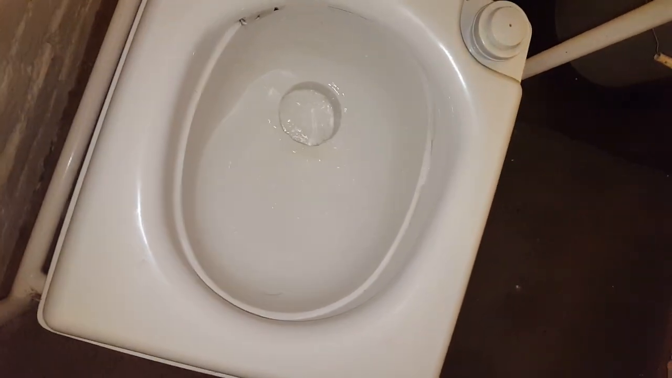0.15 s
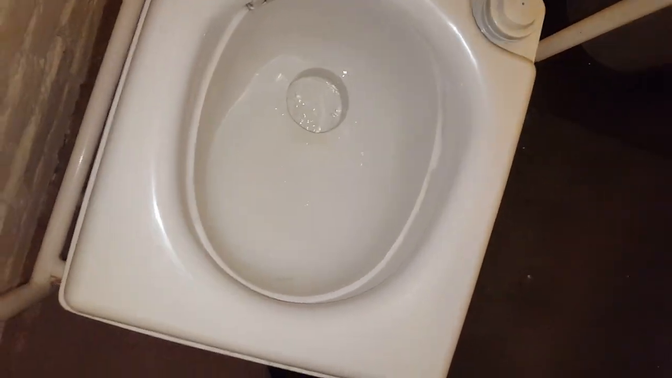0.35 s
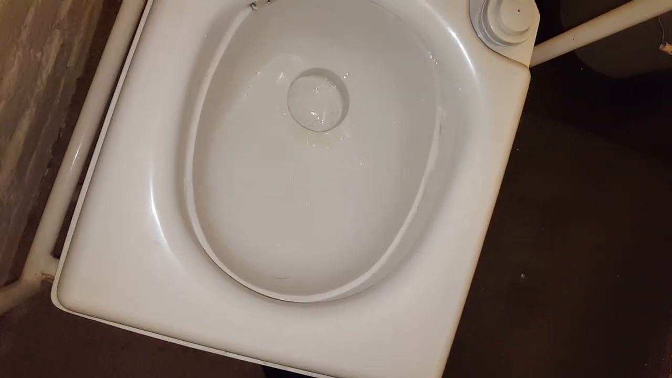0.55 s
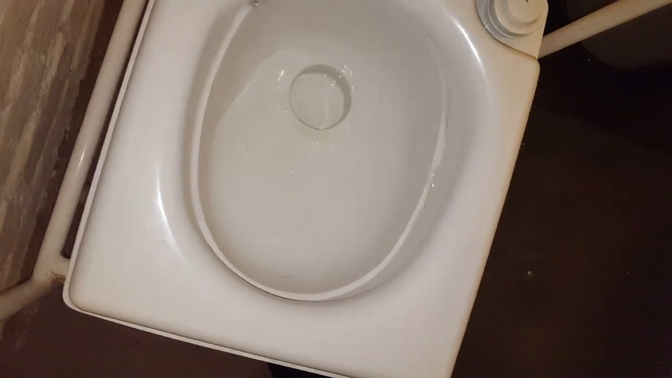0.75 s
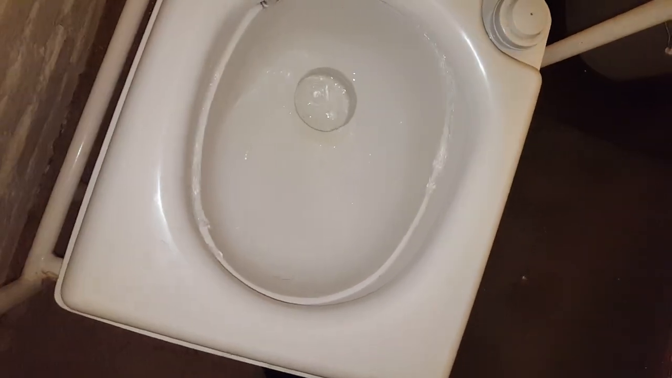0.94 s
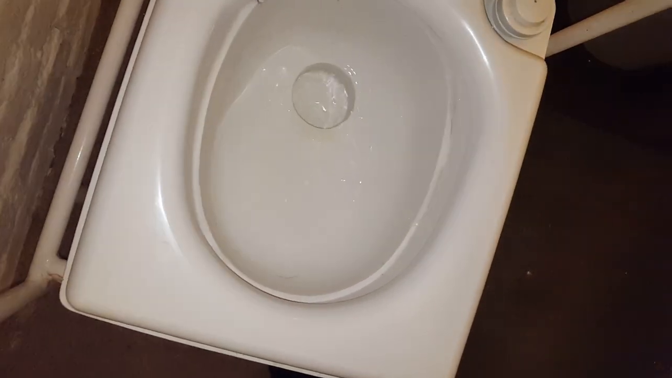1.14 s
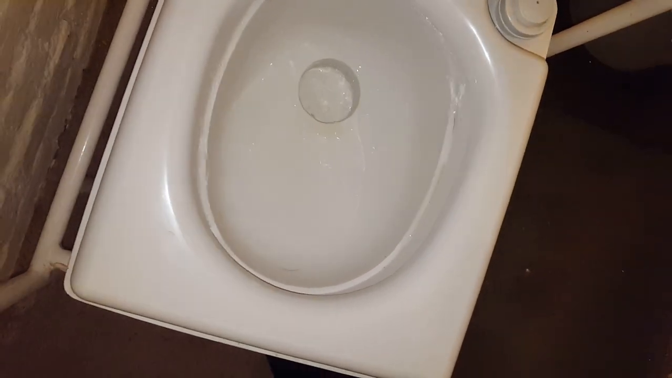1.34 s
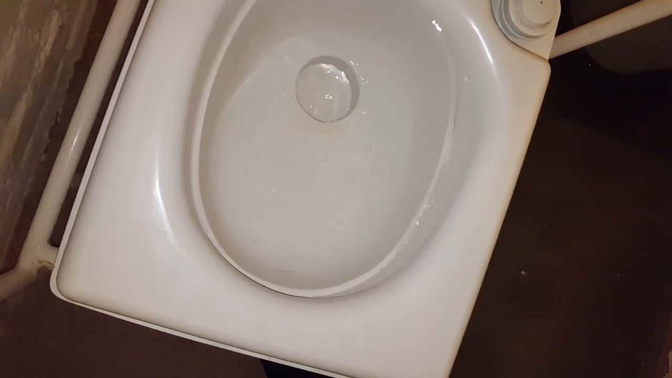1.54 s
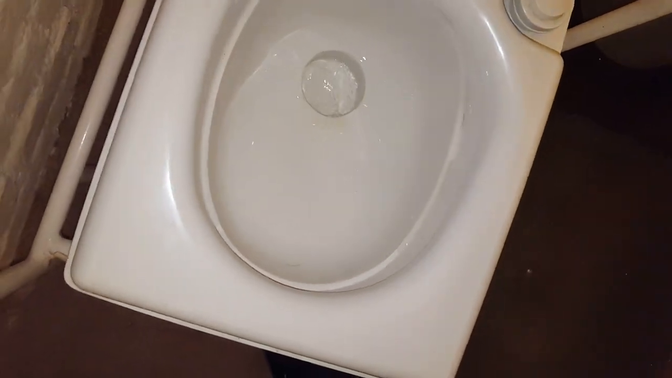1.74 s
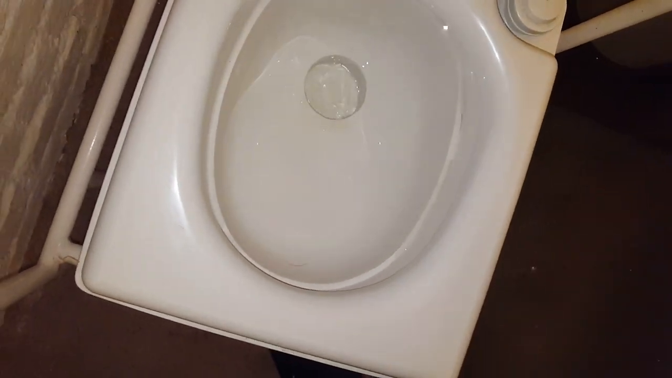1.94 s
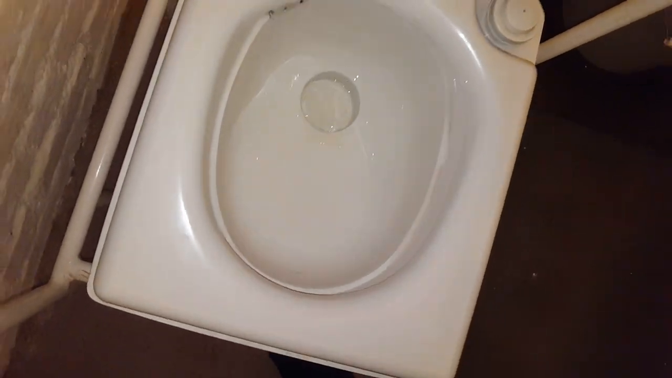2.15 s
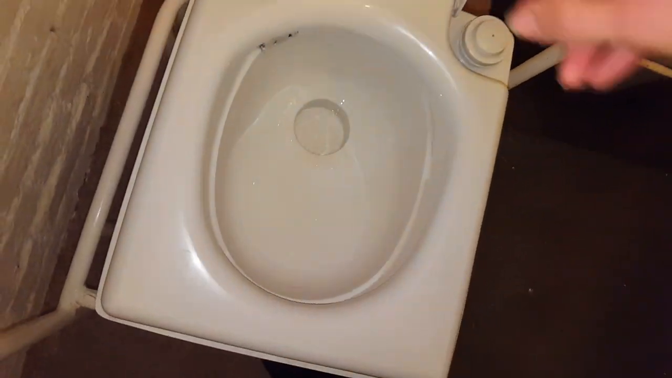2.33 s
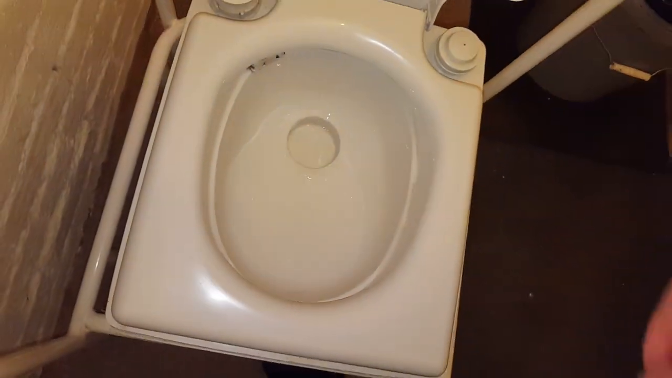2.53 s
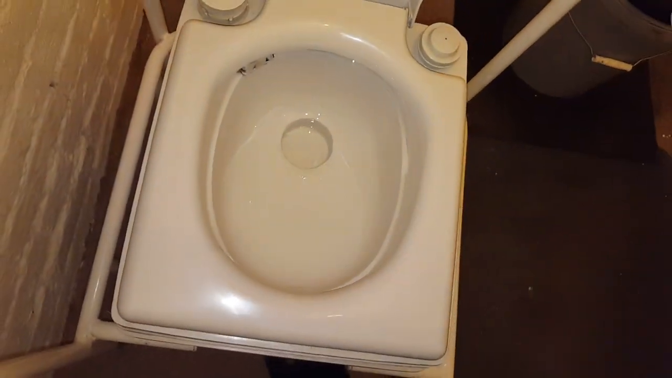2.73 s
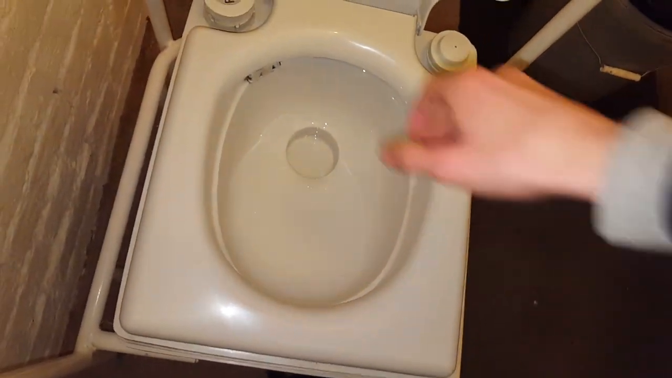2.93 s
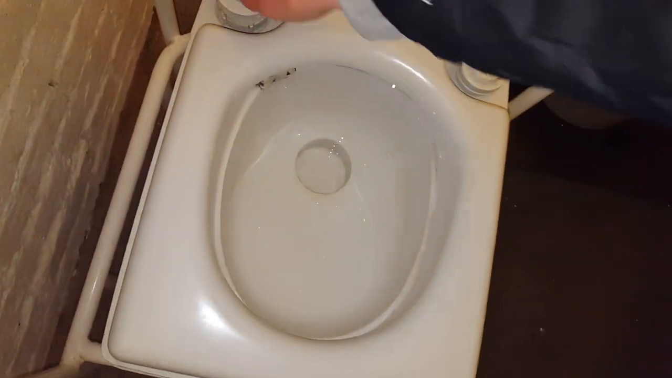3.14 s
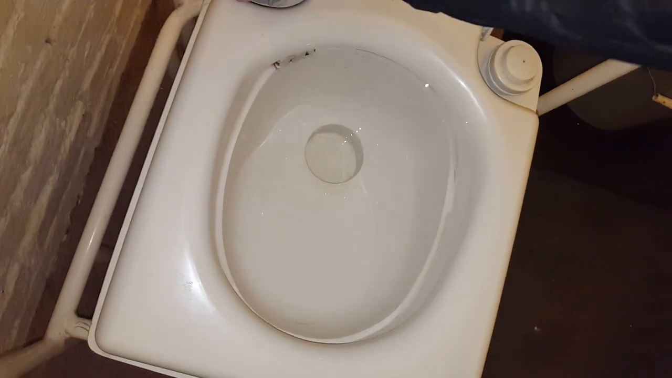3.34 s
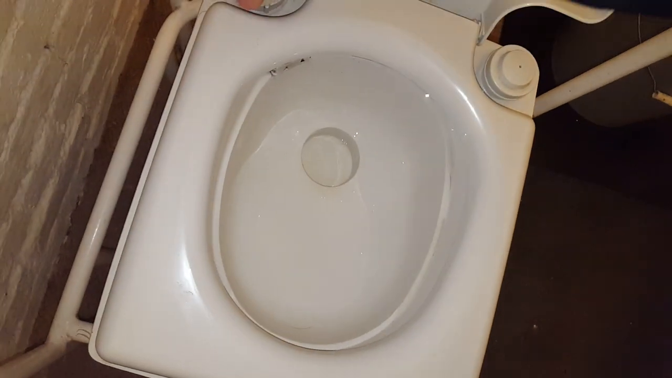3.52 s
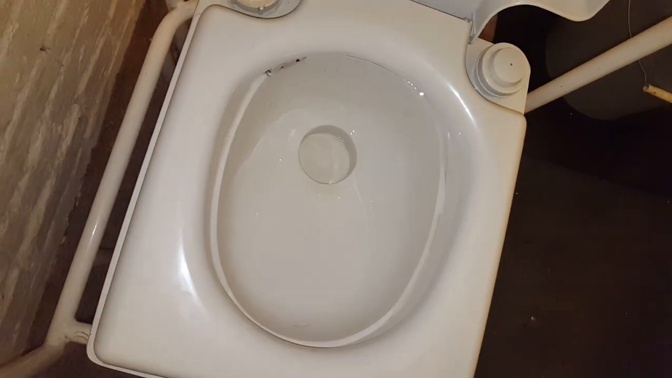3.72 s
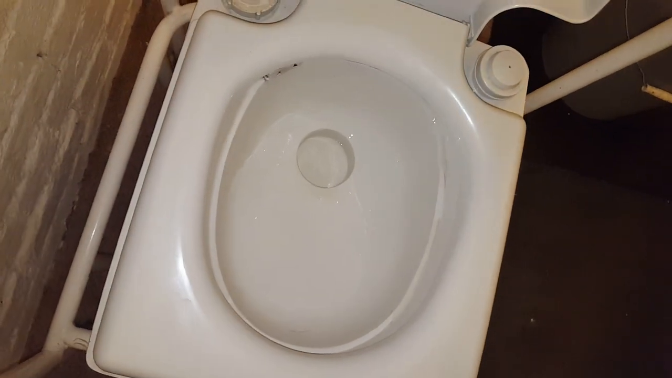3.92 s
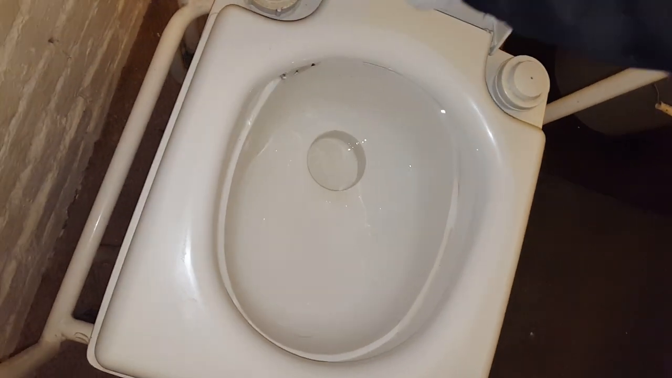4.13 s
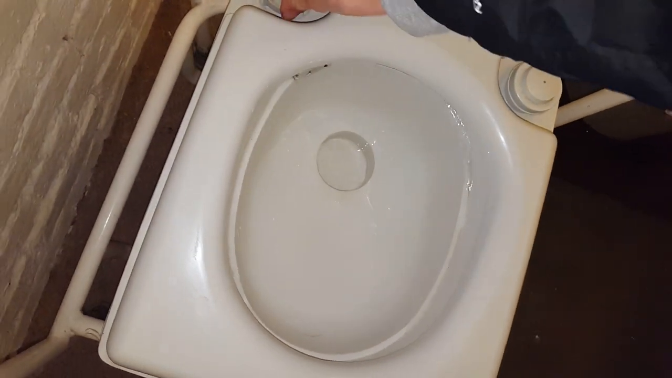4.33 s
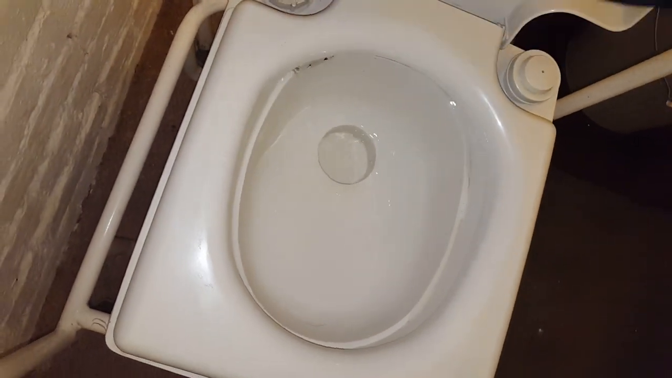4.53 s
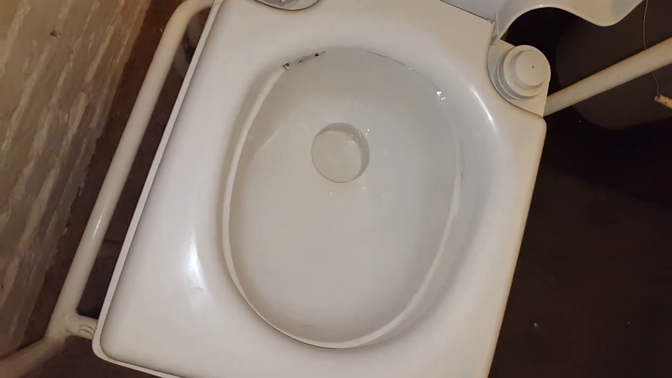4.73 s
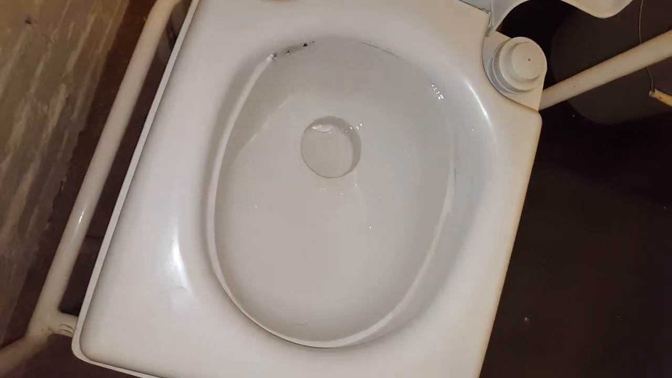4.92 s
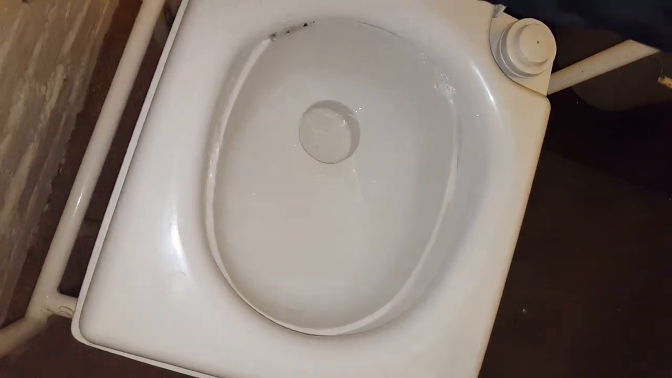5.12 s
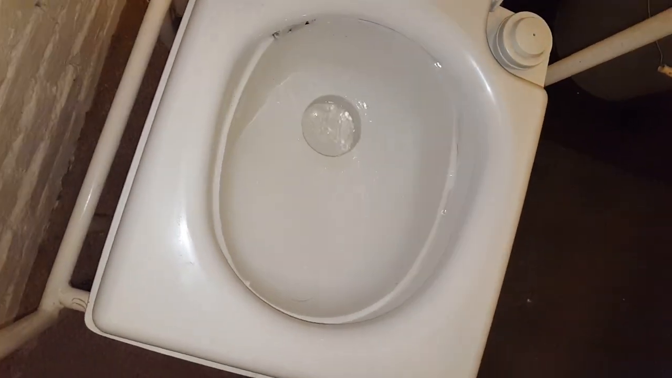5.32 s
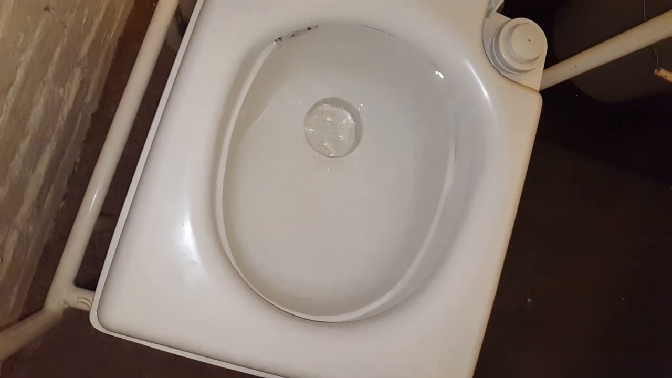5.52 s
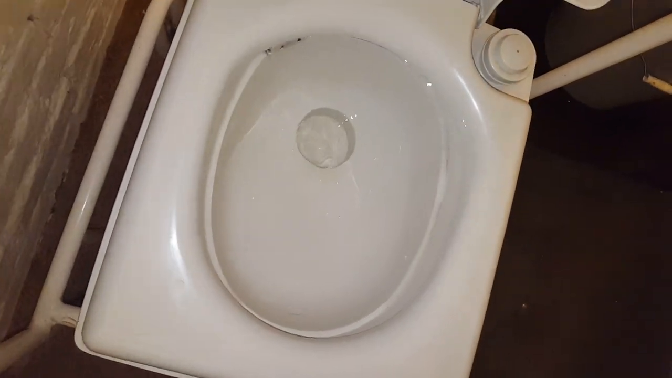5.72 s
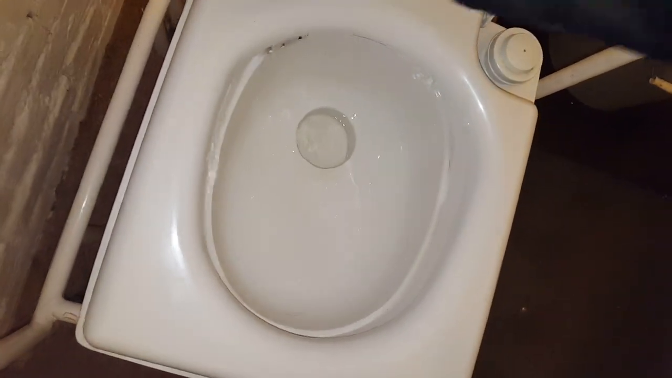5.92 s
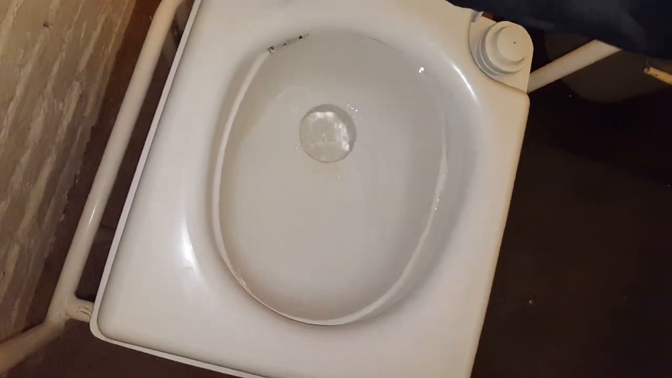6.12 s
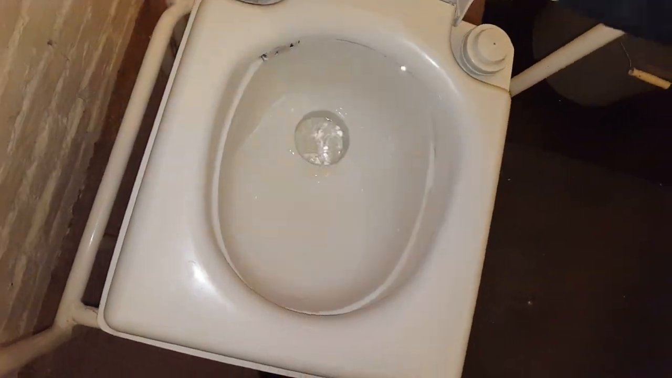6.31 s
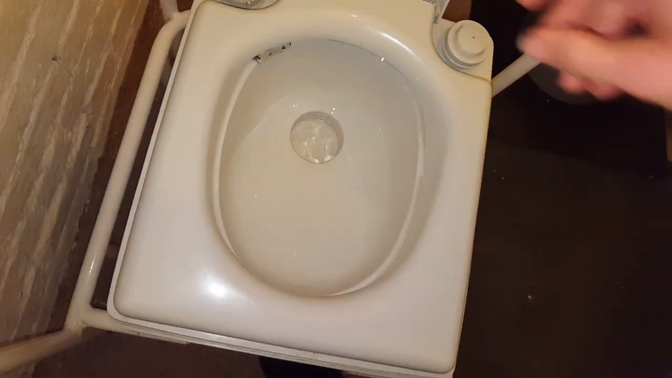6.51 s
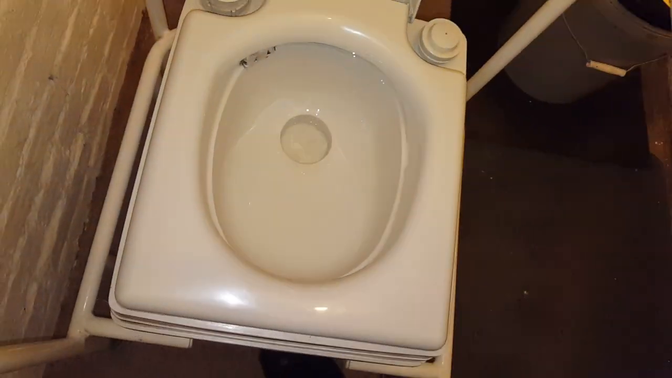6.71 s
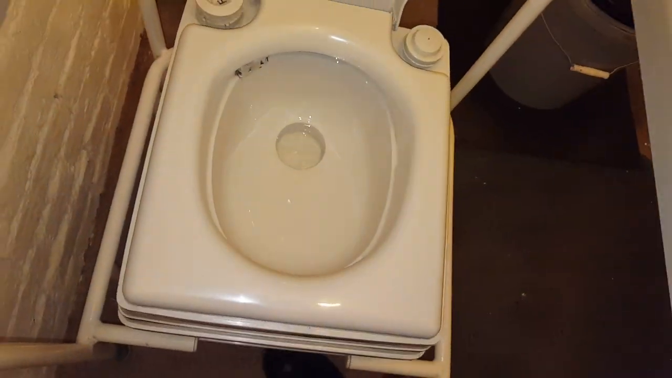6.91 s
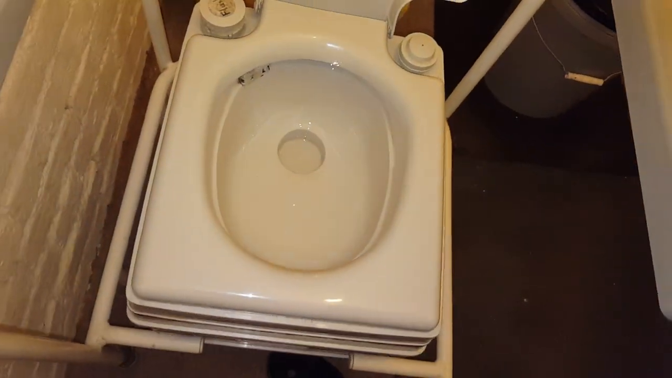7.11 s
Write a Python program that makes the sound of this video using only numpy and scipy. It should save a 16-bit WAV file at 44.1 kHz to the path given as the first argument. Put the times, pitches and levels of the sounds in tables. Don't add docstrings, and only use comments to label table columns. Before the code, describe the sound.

Rapid hollow plastic clacks and juddering scrapes of a toilet's hand pump, wet gurgles and air spits, a quiet pause, then a second bout with sharp slams.

```python
import sys
import numpy as np
from scipy import signal
from scipy.fft import rfft, irfft, next_fast_len
from scipy.io import wavfile
from scipy.ndimage import uniform_filter1d

SR = 44100
rng = np.random.default_rng(int(sys.argv[2]) if len(sys.argv) > 2 else 0)


def boost(x):
    u = np.asarray(x, float) / 20
    return 10 ** u


def generate_wav(signal):
    frames = np.transpose(np.atleast_2d(signal))
    scaled = np.clip(frames, -1, 1) * 32767
    pcm = np.round(scaled).astype(np.int16)
    wavfile.write(sys.argv[1], SR, pcm)


N = 315756

# (time at strength [s], hold [s], swell over the hold [dB], scrape [dB], seal hiss [dB])
PUSHES = [(0.134, 0.38, 6, -33.5, -40), (0.423, 0.068, 4, -21.5, -27.5), (0.62, 0.018, 10.5, -41, -46.5),
          (0.822, 0.089, 3.5, -18.5, -24), (1.06, 0.031, -8, -30.5, -36.5), (1.275, 0.09, 1, -18, -24.5),
          (1.427, 0.019, 11.5, -33.5, -40.5), (1.59, 0.12, 12, -34, -41), (1.925, 0.03, -9, -40, -76),
          (3.62, 0.027, 20.5, -54, -67), (3.74, 0.21, -22, -27, -58), (4.19, 0.068, 1, -30, -32),
          (4.445, 0.0098, 3.5, -45, -55.5), (4.69, 0.034, -2.5, -23, -32.5), (5.011, 0.11, 6.5, -30, -35),
          (5.29, 0.016, -7, -40.5, -46.5), (5.4, 0.21, 0, -29, -34.5), (5.865, 0.12, 5, -34, -34)]
# (time [s], hold [s], swell over the hold [dB], scrape [dB], seal hiss [dB])
JERKS = [(0.0, 0.009, -9, -25.5, -33.5), (0.255, 0.084, 1.5, -22.5, -31.5),
         (0.668, 0.074, -1.5, -26.5, -32), (1.088, 0.083, -6.5, -21, -31), (1.65, 0.027, -14.5, -15, -34.5),
         (1.746, 0.079, -20, -15.5, -20.5), (3.67, 0.13, -4.5, -24, -33), (4.0, 0.0087, -12, -27, -37),
         (4.067, 0.069, 2, -32, -69), (4.098, .035, -2, -45, -32.5), (4.135, .012, -9, -34, -23.5),
         (4.276, 0.011, -7, -19.5, -20.5), (4.492, 0.12, 14.5, -34.5, -44.5), (4.889, 0.015, -10, -27, -48),
         (4.935, 0.049, 3.5, -29, -44), (5.15, 0.069, -19, -23.5, -19.5), (5.795, 0.067, 6, -34, -65.5),
         (6.008, 0.026, 2, -30.5, -26.5)]
LEAN_IN_DB_PER_S, BREAK_DB_PER_S = (305.5, 357.5), 3002
LET_GO_DB_PER_S = (282, 318.5)
# (time [s], frame thump [dB], tank hum [dB], lid drumming [dB])
JOLTS = [(0.0, -37, -23.5, -32), (0.062, -45, -35.5, -31), (0.205, -62.5, -28.5, -26),
         (0.294, -27.5, -26, -29), (0.416, -50, -27.5, -26), (0.52, -36.5, -29, -35.5),
         (0.682, -48.5, -37, -36), (0.726, -27.5, -29, -25), (0.865, -30, -23.5, -20),
         (0.944, -30, -20, -20), (1.132, -54, -42.5, -39), (1.327, -27, -23, -31), (1.44, -49, -24, -28.5),
         (1.653, -40, -37.5, -27.5), (1.728, -23.5, -23.5, -20.5), (1.87, -44.5, -45.5, -36.5),
         (3.091, -49.5, -51, -66), (3.3, -40.5, -51, -50), (3.704, -27.5, -25, -21.5),
               (3.789, -43.5, -23.5, -18.5), (3.842, -38.5, -21, -35.5), (4.093, -58, -34, -28.5),
               (4.282, -45, -39.5, -28), (4.369, -40, -40, -44), (4.584, -45.5, -34, -32.5),
               (4.72, -55, -42.5, -34), (4.793, -56.5, -36, -42.5), (4.924, -49.5, -35.5, -30.5),
               (5.06, -60, -33, -29.5), (5.14, -24.5, -32.5, -19), (5.35, -47.5, -50.5, -40.5),
               (5.424, -63.5, -57, -34.5), (5.491, -69, -41, -31.5), (5.639, -47, -29.5, -23),
               (5.765, -66, -35, -37.5), (5.896, -64, -36.5, -23), (6.027, -34, -23, -25),
               (6.122, -43, -28.5, -36.5), (6.201, -61, -38, -50)]
JOLT_HOLD_S = 0.017
JOLT_GROWS_DB_PER_S = (900.5, 451.5, 495)
JOLT_DIES_DB_PER_S = (200.5, 148.5, 182)
CREEP_DB, CREEP_DIES_DB_PER_S = -30, 64.5

# (time [s], peak level [dB], crack level [dB])
KNOCKS = [(0.003, -15.5, -35.5), (0.175, -26, -28), (0.252, -2.5, -19.5), (0.268, -8.5, -13.5),
          (0.3082, -5.5, -14.5), (0.328, -9.5, -14), (0.29, -21, -23), (0.348, -15, -22),
          (0.52, -14, -19.5), (0.6665, -4, -17.5), (0.686, -8, -13.5), (0.6985, -11.5, -24),
          (0.875, -14, -20), (0.92, -17.5, -22), (0.93, -16.5, -23.5), (1.0835, -4.5, -15.5),
          (1.1155, -6.5, -18), (1.166, -16.5, -17), (1.2, -22, -36.5), (1.213, -33.5, -35),
          (1.2445, -17.5, -22.5), (1.311, -14.5, -14.5), (1.338, -20.5, -20.5), (1.396, -12.5, -21.5),
          (0.472, -12.5, -26.5), (0.495, -16.5, -18.5), (1.365, -14, -28), (1.451, -20, -24),
          (1.5, -21.5, -21.5), (1.552, -23.5, -12), (1.787, -17.5, -23), (1.648, -7.5, -13),
          (1.6725, -8, -12), (1.702, -8.5, -22), (1.723, -10.5, -16), (1.863, -23, -19),
          (1.948, -33.5, -25),
          (3.326, -36, -25), (3.335, -25.5, -10.5), (3.604, -27, -34.5), (3.641, -28, -9),
                (3.6658, -20.5, -22), (3.679, -27.5, 10), (3.741, -23.5, -37), (3.773, -19, -37),
                (3.7778, -10, -20), (3.797, -18, -17), (3.834, -14.5, -14.5), (3.85, -48, -12),
                (3.871, -25, -25), (3.909, -31.5, -25), (3.946, -37, -32), (3.343, -31.5, -22),
                (3.352, -40, -27), (3.999, -34, -1), (4.062, -22, -25), (4.085, -13.5, -19),
                (4.49, -26, -15), (4.587, -17.5, -8), (4.617, -29, -16), (4.886, -15.5, -12.5),
                (4.933, -13, -18.5), (4.951, -19.5, -15), (4.96, -17.5, -17), (5.023, -28.5, -33),
                (5.037, -21, -18), (5.054, -46.5, -20), (5.131, -33, -23.5), (5.4927, -28.5, -1),
                (5.62, -17, -15.5), (5.771, -39, -17.5), (5.8585, -25, -14), (5.355, -28, -10.5),
                (5.637, -21, -32), (5.718, -32, -15.5), (5.789, -25.5, -31.5), (5.816, -19, -18)]
# (time [s], peak level [dB], crack level [dB])
SLAMS = [
    (1.745, -4.5, -1),
    (4.273, -5.5, -3.5),
    (5.147, -2.5, -2),
    (6.005, -3.5, 1.5),
]
LID_DB, LID_FOLLOWS = -23, 0.71

# (time [s], length [s], level [dB], start pitch [Hz], end pitch [Hz])
GURGLES = [(0.16, 0.045, -21.5, 223, 247), (0.21, 0.045, -22, 248, 200), (0.85, .04, -20, 225, 210),
           (0.87, 0.073, -21, 540, 550), (1.323, 0.04, -21, 220, 208), (1.852, .04, -29.5, 221, 227),
           (3.682, .03, -22.5, 285, 250), (3.733, 0.028, -16, 184, 220), (3.7794, 0.052, -13.5, 232.5, 230),
           (3.79, 0.041, -23, 379, 330), (4.203, .045, -30.5, 230, 226), (4.273, 0.017, -21.5, 247, 231),
           (4.295, 0.044, -24.5, 294, 244), (5.015, .03, -24, 227, 213), (5.47, 0.042, -26.5, 220, 208),
           (5.46, 0.11, -27, 930, 1100), (5.58, 0.035, -24, 1300, 1220), (5.615, 0.035, -24, 1150, 980),
           (5.576, 0.06, -26, 570, 420), (5.628, .035, -20, 303, 240), (5.628, 0.053, -39, 350, 417),
           (5.705, 0.035, -27.5, 212, 209), (5.885, 0.026, -29, 230, 240), (6.024, 0.038, -19.5, 406, 307),
           (4.917, 0.068, -21, 410, 404), (1.095, .045, -23, 412, 399), (0.262, 0.038, -19, 228, 260),
           (0.27, 0.044, -23, 404, 400), (4.555, .06, -30, 291, 320), (3.7, 0.053, -26.5, 910, 1000),
           (4.77, .05, -37.5, 290, 280), (6.328, .05, -45, 204, 204), (0.93, .06, -21.5, 280, 250),
           (0.99, .06, -29.5, 270, 265), (0.066, .06, -27.5, 230, 206)]
# (time [s], peak level [dB], centre [Hz])
SPITS = [(0.47, -14.5, 3900), (0.45, -16.5, 5700), (0.815, -15.5, 6000), (0.83, -12, 8500),
         (0.86, -10.5, 5600), (0.804, -25, 5500), (0.653, -30.5, 6000), (1.29, -6, 6950),
         (1.551, -31, 8200), (3.244, -29, 5600), (3.665, -16, 6500), (3.6652, -32, 13000),
         (3.692, -9, 6040), (3.7183, -11.5, 5350), (4.136, -17, 5100), (4.6963, -16.5, 7900),
         (3.78, -25.5, 8660), (3.693, -25, 13000), (3.719, -26.5, 11500), (4.2, -29.5, 17000),
         (3.641, -32.5, 7500), (0.2515, -20.5, 7000), (0.305, -24.5, 6500), (0.667, -16, 3950),
         (1.084, -17.5, 3500), (4.593, -25, 5800), (4.527, -26, 5000), (4.8865, -24, 3350),
         (3.679, -15.5, 3200), (0.565, -42, 13800), (4.455, -45, 9000), (5.771, -48, 12000),
         (0.065, -39, 7500), (0.0917, -40.5, 6100), (0.6265, -34.5, 6000), (3.736, -22, 5200),
         (3.749, -22, 7430), (3.861, -41, 7000), (5.091, -31, 7300), (5.097, -15, 4800), (5.33, -40, 9200),
         (5.3375, -34, 3900), (5.395, -36, 11000), (5.542, -35, 10900), (5.619, -30.5, 12300),
         (5.716, -49, 8600), (0.27, -34, 11500)]
# (time [s], length [s], level [dB], start pitch [Hz], end pitch [Hz])
SQUEAKS = [
    (0.603, 0.03, -41, 3500, 3080),
]
# (time [s], peak level [dB], centre [Hz], life [cycles], left-right [dB])
TICKS = [(2.267, -42.5, 926, 2.2, -10.5), (2.519, -40, 885, 3.3, -8.5), (2.624, -42, 750, 3, -6),
         (3.142, -31, 1000, 1.9, -20), (3.2627, -26, 2500, 1.8, -14), (3.2467, -34, 2500, 3.9, -17),
         (3.278, -31, 600, 2.2, -10), (3.385, -48, 6000, 3, -5), (3.481, -41.5, 900, 4.1, -8),
         (3.517, -53, 1200, 4, 0), (3.56, -42, 804, 5.2, 1), (6.624, -40, 1390, 2.4, -19),
         (6.645, -44, 1000, 4, -3), (6.655, -42, 900, 2.8, -5), (6.685, -44, 610, 2.2, -9),
         (6.805, -45, 11000, 4.3, -1), (2.059, -65, 201.5, 28, -3), (3.2293, -17, 1685, 1.4, -18),
         (3.3358, -29, 2310, 3, -4.5), (6.4624, -29.5, 2100, 4, -8), (6.463, -45, 4300, 6, -7),
         (6.173, -48, 2000, 4, -5), (6.94, -50.5, 600, 3.8, -3)]
# (time [s], hold [s], swell over the hold [dB], dull rub [dB], bright rustle [dB])
SLEEVE = [(2.03, 0.306, 1.5, -65, -61.5), (2.426, 0.12, 0.5, -55, -52.5), (2.6, 0.29, 1.5, -65.5, -56),
          (2.943, 0.31, 14, -57.5, -53), (3.37, 0.24, -1, -44, -51), (3.8, 2.7, -5, -61, -57.5),
          (6.22, 0.12, 8.5, -58, -59), (6.425, 0.15, 4, -58, -55.5), (6.64, 0.04, -5, -52, -49),
          (6.72, 0.086, 0, -55.5, -48), (6.9, 0.48, -1, -61.5, -62)]
ARM_STARTS_DB_PER_S, ARM_STOPS_DB_PER_S = 120.5, 121.5

# (centre [Hz], width [Hz], level [dB])
FRAME = [(55, 41, -18.5), (76.3, 8.5, 11), (96, 21, 4.5)]
# (centre [Hz], width [Hz], level [dB])
TANK = [(139.6, 6, -1), (144, 37, -18)]
# (centre [Hz], width [Hz], level [dB])
LID = [(212.4, 14.6, 1), (259.7, 16, -2.5), (289.6, 37, -3), (324.2, 44, -5.5), (410, 29, -5)]
# (centre [Hz], width [Hz], level [dB])
BARREL = [(515.5, 105, -2.5), (654, 25, -4.5), (716, 49, -7.5), (818, 52, -2), (926, 81, 2.5),
          (1123, 123, 3), (1281, 96, 2.5), (1402, 64, 1.5), (1516, 160, -1.5), (1920, 390, 2),
          (2060, 574, 0), (2810, 2100, -15.5)]
# (centre [Hz], width [Hz], level [dB])
VALVE = [(3184, 300, 13), (3446, 200, 14), (3750, 100, 13.5), (4300, 280, 7), (5130, 620, 2),
         (7000, 920, 2.5), (10500, 4000, -28.5)]
# (centre [Hz], width [Hz], level [dB])
STOP = [(480, 120, -4.5), (900, 120, 6.5), (1000, 520, -1.5), (1260, 140, 2.5), (1920, 260, -4.5),
        (2297, 140, 3.5), (2680, 560, -2)]

# (frequency [Hz], level per Hz [dB])
SEAL = [(1290, -27.5), (2200, -2.5), (2600, -10), (3320, -5.5), (3990, -9.5), (6020, -9.5), (6550, -11.5),
        (8210, -14.5), (10200, -22.5), (12600, -25), (14900, -26.5), (16300, -37.5)]
# (frequency [Hz], level per Hz [dB])
CRACK = [(1410, -37.5), (2400, -35), (4180, -8), (4670, -7.5), (7150, -6), (10400, -18.5), (13900, -24),
         (16300, -46)]
# (frequency [Hz], level per Hz [dB])
RUB = [(35, -27.5), (60, -5), (135, 0), (232, -2.5), (453, -3), (500, -4), (545, -4), (1800, -15),
       (2340, -19), (3960, -120)]
# (frequency [Hz], level per Hz [dB])
RUSTLE = [(880, -6), (1500, -6), (2790, -4), (3210, -5), (6990, -10), (8200, -10), (10400, -17.5),
          (15100, -16), (16300, -17)]
# (frequency [Hz], level per Hz [dB])
STILL = [(12, -44), (20, 3.5), (53, -8), (184, -9.5), (403, -21), (476, -14), (961, -19), (1140, -26.5),
         (4370, -37), (14600, -30.5), (16300, -27)]

# (frequency [Hz], likeness [-1 to 1])
ALIKE = [(40, .85), (80, 0.96), (150, 1), (300, 0.97), (640, 0.7), (1400, 0.45), (3000, 0.086),
         (15000, 0.033)]
# (frequency [Hz], likeness [-1 to 1])
ALIKE_FAR = [(60, 0.88), (240, 0.63), (950, -0.01), (3770, 0.034), (15000, -0.34)]
# (frequency [Hz], left-right [dB])
LEAN = [(30, 5.5), (60, -2.5), (125, 2.5), (250, -0.6), (600, -4), (1200, 1), (4000, 2), (9000, 3),
        (14000, 1)]
# (frequency [Hz], time to fall 60 dB [s])
ROOM = [(100, 0.51), (500, 0.28), (1500, 0.13), (4000, 0.25), (12000, 0.13)]


def unit(x):
    return x / np.sqrt(np.mean(np.abs(x) ** 2) + 1e-20)


def along(points, hz):
    f, v = np.transpose(points)
    return np.interp(np.log(hz + 1), np.log(f + 1), v)


def gains(moves, grow_db, die_db):
    t = np.arange(N) / SR
    power = 0
    for start, hold, swell_db, *levels_db in moves:
        swell = swell_db * np.clip((t - start) / max(hold, 1 / SR), 0, 1)
        held_db = swell - np.outer(grow_db, np.maximum(start - t, 0))
        after = np.maximum(t - start - hold, 0)
        dying = boost(-2 * np.outer(die_db, after))
        creeping = boost(2 * (CREEP_DB - CREEP_DIES_DB_PER_S * after))
        power = power + boost(2 * (np.array(levels_db)[:, None] + held_db)) * (dying + creeping)
    return np.sqrt(power)


def wobble(rate):
    points = rng.standard_normal(int(N * rate / SR) + 2)
    return np.interp(np.arange(N) * rate / SR, np.arange(len(points)), points)


def filtered(x, response):
    m = next_fast_len(N + SR // 2)
    return irfft(rfft(x, m) * response(np.fft.rfftfreq(m, 1 / SR)), m)[..., :N]


def body(modes):
    def response(f):
        total = 0
        for k, (centre, width, db) in enumerate(modes):
            mode = 1j * f * width / (centre * centre - f * f + 1j * f * width)
            total = total + (-1) ** k * boost(db) * mode
        return unit(total)
    return response


def softened(response, hz):
    return lambda f: response(f) / (1 + 1.2j * f / hz - (f / hz) ** 2)


def colour(spectrum):
    return lambda f: unit(boost(along(spectrum, f)))


def steady(modes, even_s):
    ring = filtered(rng.standard_normal((2, N)), body(modes))
    return ring / np.sqrt(np.abs(uniform_filter1d(ring ** 2, size=round(even_s * SR))) + 0.11)


def friction(judder_db, rate, patchy_db):
    z = signal.stft(rng.standard_normal((2, N)), nperseg=256)[2]
    field = uniform_filter1d(rng.standard_normal(z.shape[1:]), size=5, axis=0)
    field = uniform_filter1d(field, size=8, axis=1)
    pair = signal.istft(z * boost(patchy_db * unit(field)), nperseg=256)[1][:, :N]
    starts = (rng.random(N) < rate / SR) * boost(judder_db * rng.standard_normal(N))
    slips = signal.lfilter([1], [1, -np.exp(-rate / SR)], starts)
    return unit((1.7 + slips) * pair)


def bursts(times, levels_db, t60, blow=7.36):
    out, t = np.zeros((2, N + SR)), np.arange(SR // 16) / SR
    for s, db in zip(times, levels_db):
        burst = rng.standard_normal((2, len(t))) + blow * boost(-60 * t / 0.0011)
        out[:, round(s * SR):][:, :len(t)] += boost(db - 60 * t / t60) * burst
    return out[:, :N]


def glide(length, from_hz, to_hz):
    u = np.arange(round(length * SR)) / (length * SR)
    return u, 2 * np.pi * length * (from_hz * u + (to_hz - from_hz) * u ** 2 / 2)


def strokes():
    jolts = [(s, JOLT_HOLD_S, 0, *db) for s, *db in JOLTS]
    thump, hum, drum = gains(jolts, JOLT_GROWS_DB_PER_S, JOLT_DIES_DB_PER_S)
    pushing = gains(PUSHES, LEAN_IN_DB_PER_S, LET_GO_DB_PER_S)
    jerking = gains(JERKS, BREAK_DB_PER_S, LET_GO_DB_PER_S)
    scrape, hiss = np.hypot(pushing, jerking)
    low = thump * steady(FRAME, even_s=0.027) + hum * steady(TANK, even_s=0.012)
    low = low + drum * boost(2.1 * wobble(60)) * steady(LID, even_s=0.027)
    mid = filtered(scrape * friction(judder_db=3, rate=300, patchy_db=1.7), body(BARREL))
    high = filtered(hiss * friction(judder_db=2, rate=900, patchy_db=1.6), colour(SEAL))
    return boost(0.5) * low + boost(2.0) * mid + boost(2.0) * high


def contacts(events, ring, crack, ring_t60, crack_t60, crack_gain_db, snap):
    s, db, crack_db = np.transpose(events)
    drum = filtered(bursts(s, LID_DB + LID_FOLLOWS * db, 0.0052), body(LID))
    top = filtered(bursts(s, db + crack_db + crack_gain_db, crack_t60, snap), crack)
    return filtered(bursts(s, db - 10.0, ring_t60), ring) + drum + top


def knocks():
    return contacts(KNOCKS, softened(body(BARREL), hz=2200), softened(body(VALVE), hz=5000),
                    ring_t60=0.015, crack_t60=0.026, crack_gain_db=2.0, snap=4.0)


def slams():
    return contacts(SLAMS, body(STOP), colour(CRACK),
                    ring_t60=0.012, crack_t60=0.018, crack_gain_db=-7.0, snap=7.0)


def gurgles():
    out = np.zeros((2, N))
    for s, length, db, from_hz, to_hz in GURGLES:
        u, phase = glide(length, from_hz, to_hz)
        noise = rng.standard_normal((2, SR // 4))
        flutter = uniform_filter1d(noise, size=round(6 * SR / from_hz))[:, :len(u)]
        flutter = np.array([[1], [0]]) + unit(flutter) * np.minimum(from_hz / 1000, 1)
        swell = np.sqrt(np.sin(np.pi * u))
        out[:, round(s * SR):][:, :len(u)] += boost(db) * swell * unit(flutter) * np.sin(phase)
    return out


def spits():
    out, t = np.zeros((2, N + SR)), np.arange(SR // 30) / SR
    for s, db, hz in SPITS:
        flutter = uniform_filter1d(rng.standard_normal((2, len(t))), size=10)
        flutter = uniform_filter1d(flutter, size=10)
        jet = unit(0.5 + unit(flutter))
        shape = boost(db + 8.5 - 60 * t / 0.014) * (1 - np.exp(-t / 0.0012))
        out[:, round(s * SR):][:, :len(t)] += np.sin(2 * np.pi * hz * t) * shape * jet
    return out[:, :N]


def squeaks():
    out = np.zeros((2, N))
    for s, length, db, from_hz, to_hz in SQUEAKS:
        u, phase = glide(length, from_hz, to_hz)
        out[0, round(s * SR):][:len(u)] += boost(db) * np.sin(np.pi * u) * np.sin(phase)
    return out


def ticks():
    out, t = np.zeros((2, N + SR)), np.arange(SR // 6) / SR
    for s, db, hz, cycles, pan_db in TICKS:
        fading = (1 - np.exp(-hz * t)) * boost(-60 * t * hz / max(cycles, 1))
        ring = 2 * np.sin(2 * np.pi * hz * t) * fading
        grit = 0.029 * rng.standard_normal((2, len(t))) * boost(-60 * t / 0.0023)
        sides_db = np.array([[pan_db / 2], [-pan_db / 2]])
        out[:, round(s * SR):][:, :len(t)] += boost(db + 15.5 + sides_db) * (ring + grit)
    return out[:, :N]


def spread(pair, alike):
    def mid_side(hz):
        turn = np.arccos(np.clip(along(alike, hz), -1, 1)) / 2
        return np.array([np.cos(turn), np.sin(turn)])
    mid, side = filtered(pair, mid_side)
    return np.array([mid + side, mid - side])


def placed(pair):
    def sides(hz):
        delay = np.exp(-2j * np.pi * np.outer([0, 9e-5], hz))
        return boost(np.outer([0.5, -0.5], along(LEAN, hz))) * delay
    return filtered(spread(pair, ALIKE), sides)


def room(x):
    out, step = np.zeros((2, N + SR)), SR // 3
    for start in range(0, N, step):
        hz, t, z = signal.stft(rng.standard_normal((2, SR // 2)), SR, nperseg=256)
        tail = signal.istft(z * boost(-60 * t / along(ROOM, hz)[:, None]), SR, nperseg=256)[1]
        wet = signal.fftconvolve(x[:, start:start + step], tail / np.linalg.norm(tail[0]), axes=1)
        late = start + 130
        out[:, late:late + wet.shape[1]] += wet
    walls = [(250, 0.5), (700, 0), (3000, -3.5), (12000, -13.5)]  # (frequency [Hz], level [dB])
    return filtered(out[:, :N], lambda hz: boost(along(walls, hz)))


def surroundings():
    rub, rustle = gains(SLEEVE, ARM_STARTS_DB_PER_S, ARM_STOPS_DB_PER_S)
    dull = filtered(rub * friction(judder_db=-0.5, rate=370, patchy_db=4.0), colour(RUB))
    bright = filtered(rustle * friction(judder_db=0.3, rate=2500, patchy_db=1.4), colour(RUSTLE))
    tone = boost(-64) * filtered(rng.standard_normal((2, N)), colour(STILL))
    return spread(boost(-0.5) * dull + boost(0.5) * bright + tone, ALIKE_FAR)


def scene():
    hits = knocks() + slams() + spits()
    slide = strokes() + gurgles() + squeaks()
    small = ticks()
    echo = room(boost(-2.0) * hits + boost(-11.0) * slide + boost(-3) * small)
    return placed(hits + slide + echo) + small + surroundings()


def band_limit(x):
    return signal.sosfilt(signal.butter(12, 16490, fs=SR, output="sos"), x)


def record(dry):
    heard = filtered(dry, lambda hz: boost(along([(25, -3), (50, -2.5), (15300, -3.0)], hz)))
    rounded = heard / (1 + np.abs(heard / 0.97) ** 6) ** (1 / 6)
    top_end = [(15800, -0.5), (16050, -36.5), (16500, -50.5)]  # (frequency [Hz], level [dB])
    mix = filtered(rounded, lambda hz: boost(along(top_end, hz)))
    return band_limit(mix)


dry = scene()
out = record(dry)
generate_wav(out)
```